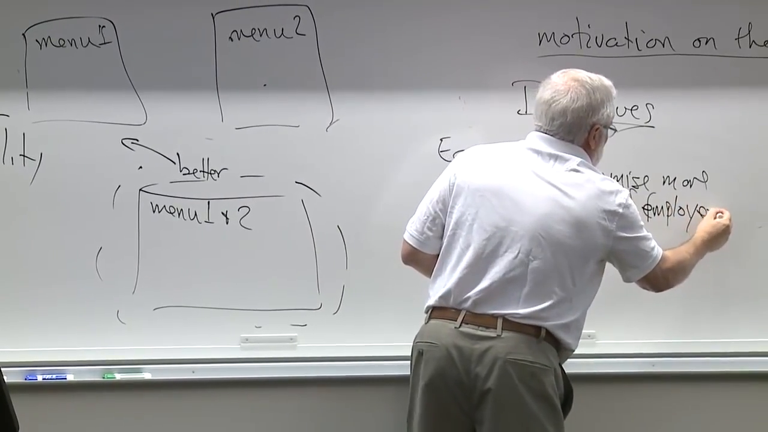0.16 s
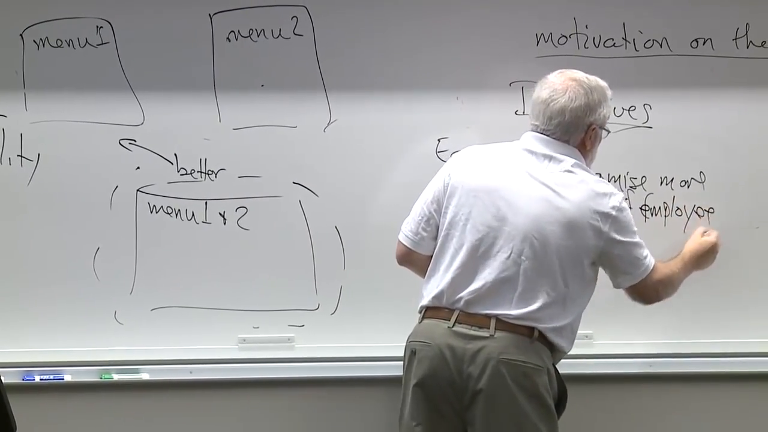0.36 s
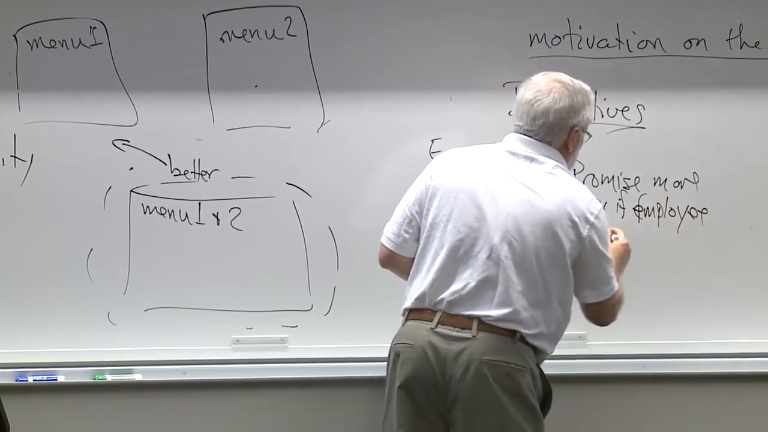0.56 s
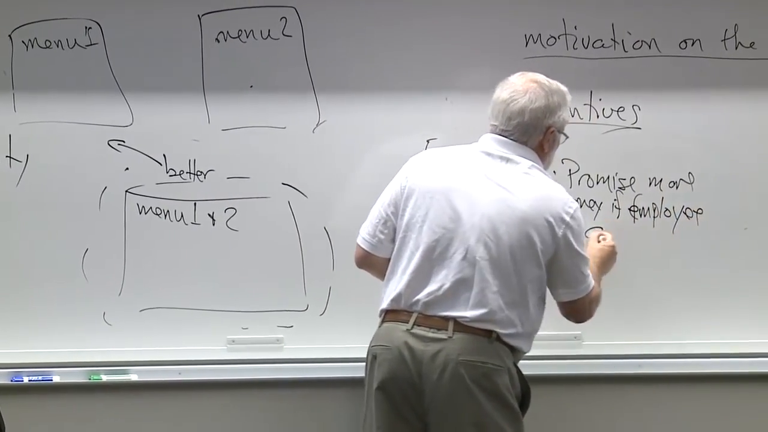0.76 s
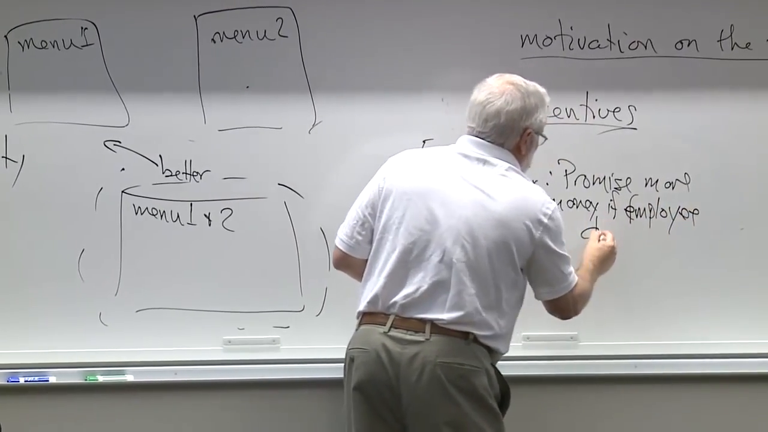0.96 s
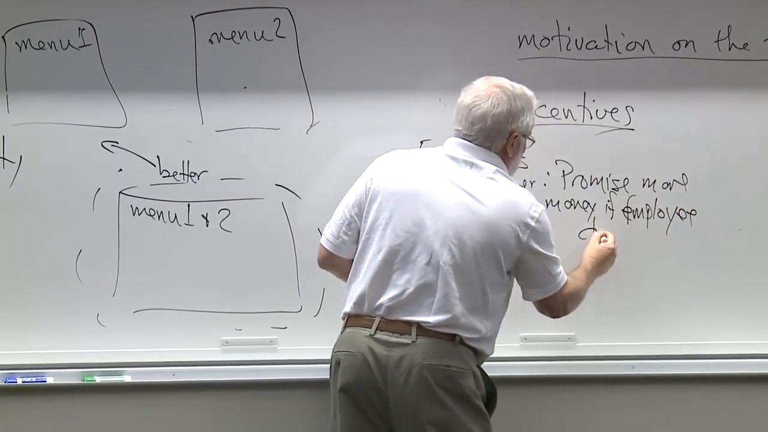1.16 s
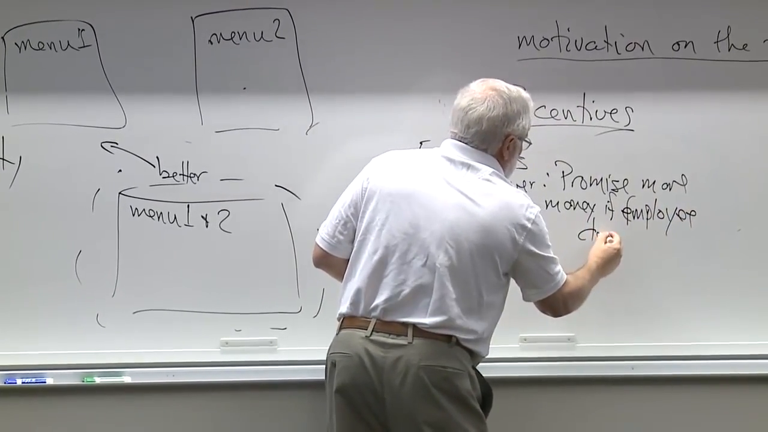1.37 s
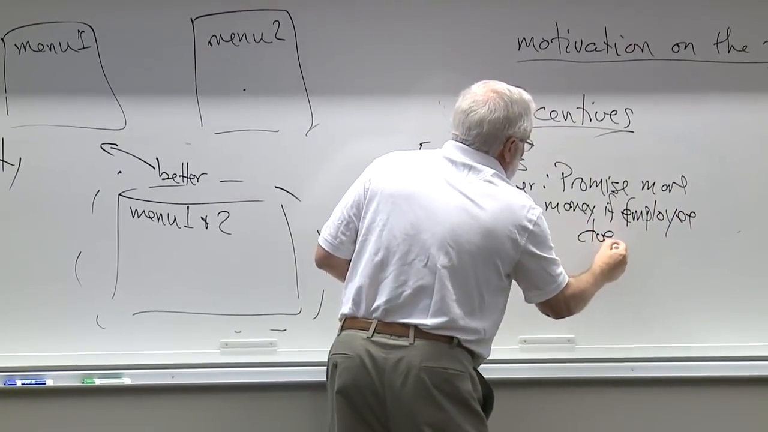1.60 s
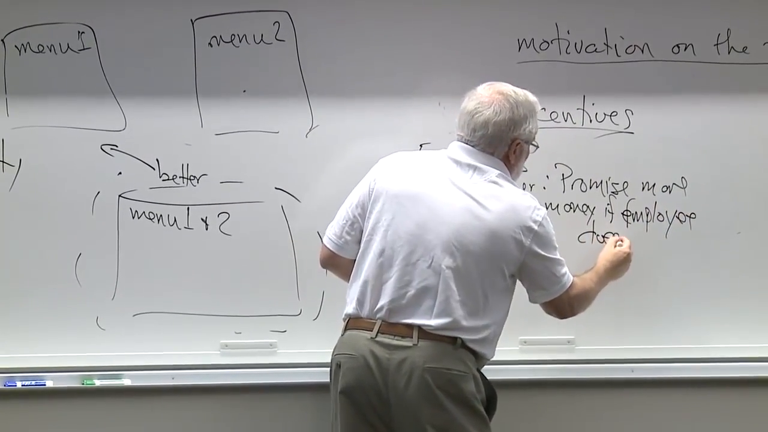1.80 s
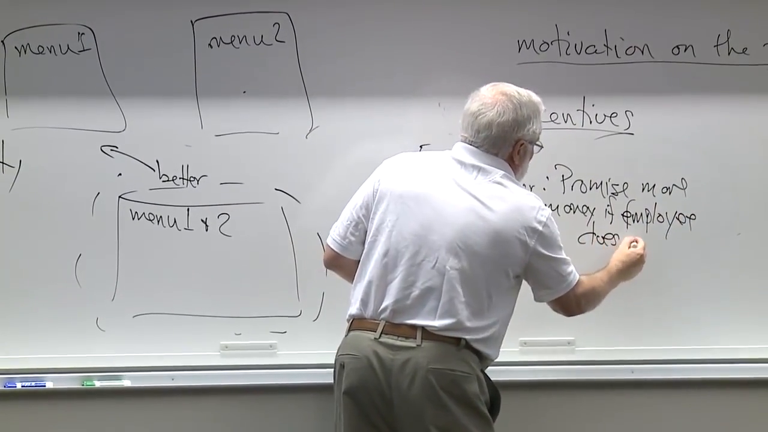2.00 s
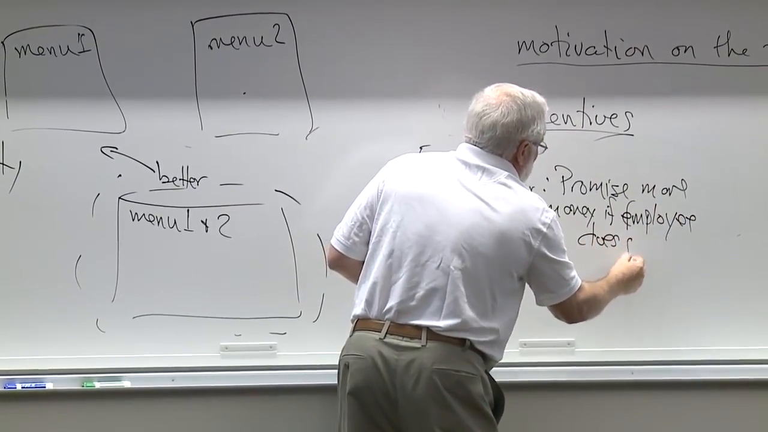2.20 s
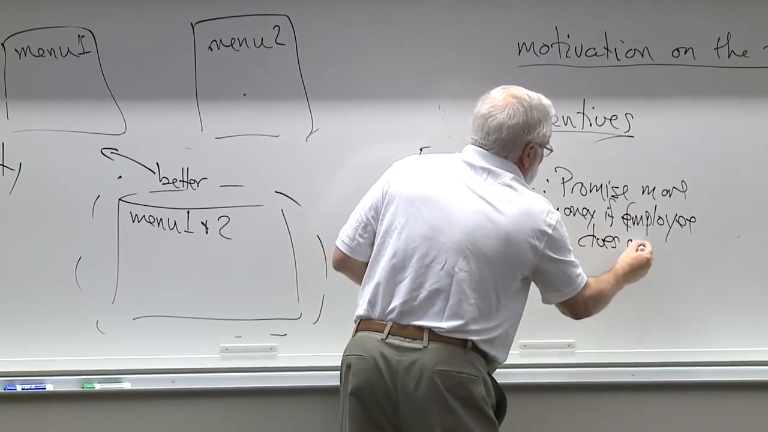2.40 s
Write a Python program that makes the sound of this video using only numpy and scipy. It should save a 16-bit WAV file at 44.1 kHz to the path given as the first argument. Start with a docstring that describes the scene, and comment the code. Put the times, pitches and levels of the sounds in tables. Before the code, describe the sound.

Quick marker strokes rub across a whiteboard in a quiet room, mixed with dull taps as the tip touches down. After a brief lull, the writing goes on with light scuffs and a few faint, thin squeaks.

```python
"""A felt marker writes quick, short strokes on a whiteboard in a lecture room.
Each stroke hisses as tiny fibre slips ring the tip and rasp the board; some add a thin
stick-slip squeak. Soft scuffs mark the turns and lifts of the tip. Each landing knocks the
hollow board, with a dull tock from the plastic barrel. Faint ventilation runs underneath."""
import sys
import numpy as np
from scipy import signal
from scipy.fft import rfft, irfft
from scipy.io import wavfile

SR = 44100
rng = np.random.default_rng(int(sys.argv[2]) if len(sys.argv) > 2 else 0)


def to_wav(s):
    """Save 16-bit WAV."""
    ch = np.atleast_2d(s).T  # columns
    pcm = np.round(np.clip(ch, -1, 1) * 32767)  # PCM
    wavfile.write(sys.argv[1], SR, pcm.astype(np.int16))


N = 108045

# The bright hiss of slipping felt. Each row: frequency in Hz, level in dB.
FELT_HISS = [(200, 0), (1500, -26), (3000, -21.5), (4200, -14), (5300, -9), (7500, -5), (9000, -6),
             (12000, -6), (14000, -12), (15700, -14)]


def amp(db):
    """Decibels to gain."""
    return 10 ** (np.asarray(db) / 20)


def unit(x):
    """Scales to an rms of 1."""
    return x / np.sqrt(np.mean(x ** 2) + 1e-20)


def curve_at(points, hz):
    """Reads a curve on a logarithmic frequency axis."""
    point_hz, value = np.transpose(points)
    return np.interp(np.log(hz + 1), np.log(point_hz + 1), value)


def add(mix, start_s, sound):
    """Mixes a sound in at a time, trimming what falls outside."""
    at = round(start_s * SR)
    sound = sound[max(-at, 0):]
    part = mix[max(at, 0):][:len(sound)]
    part += sound[:len(part)]


def colour(noise, spectrum):
    """Gives a noise a spectrum, at unit level."""
    hz = np.fft.rfftfreq(len(noise), 1 / SR)
    return unit(irfft(rfft(noise) * amp(curve_at(spectrum, hz)), len(noise)))


def butter(x, hz, kind, order):
    """Causal low-pass or high-pass."""
    return signal.sosfilt(signal.butter(order, hz, kind, fs=SR, output="sos"), x)


def wander(seconds):
    """Half a second of smooth random drift on the given time scale."""
    return unit(butter(rng.standard_normal(SR // 2), 1 / (2 * seconds), "low", order=2))


def slips():
    """Half a second of tiny fibre slips, uneven in size and fluttering in level."""
    n = SR // 2
    slips_per_s, flutter_db = 16000, 1.42
    size_db = rng.exponential(1, n) + flutter_db * wander(seconds=0.01)
    return amp(size_db) * rng.standard_normal(n) * (rng.random(n) < slips_per_s / SR)


def ringing(tone_hz, width_hz):
    """Slips heard through one resonance."""
    hz = np.fft.rfftfreq(SR // 2, 1 / SR)
    return unit(irfft(rfft(slips()) / (1 + 2j * (hz - tone_hz) / width_hz) ** 2))


def slip_burst(spectrum, level_db, rise_s, t60_s):
    """A brief cluster of slips that dies away."""
    t = np.arange(SR // 2) / SR
    attack = np.minimum(t / rise_s, 1)
    decay_db = 60 * np.maximum(t - rise_s, 0) / t60_s
    return colour(slips(), spectrum) * attack * amp(level_db - decay_db)


def stroke(length_s, level_db, tip_hz, tip_db, treble_db, rasp_db):
    """Slips hiss in the felt, ring the tip and rasp the board, swelling with the speed of the hand."""
    # The board under the rubbing tip. Each row: frequency in Hz, level in dB.
    rasp_spectrum = [(100, -9.5), (190, 6.5), (320, 0), (500, -5.5), (900, -1.5), (1500, -8), (2100, -10),
                     (2900, -12), (4000, -10.5), (8000, -19.5)]
    treble_hz, pressure_smear = 9900, 0.017
    progress = np.arange(0, length_s, 1 / SR) / length_s
    speed = abs(np.sin(np.pi * progress ** 0.92))  # peaks just before mid-stroke
    hz = np.fft.rfftfreq(SR // 2, 1 / SR)
    felt = colour(slips(), FELT_HISS)
    treble = irfft(rfft(felt) / (1 + (treble_hz / (hz + 1)) ** 10))
    rasp = colour(slips(), rasp_spectrum)
    rasp += amp(-4 + 0.6 * rasp_db) * ringing(2420, width_hz=170)  # hard rubbing wakes a narrow ring
    tip = ringing(tip_hz, width_hz=950 + pressure_smear * tip_hz)  # changing pressure widens it
    body = felt - treble + amp(tip_db) * tip + amp(rasp_db) * rasp
    n = len(speed)
    return amp(level_db) * (speed ** 1.1 * body[:n] + amp(treble_db) * speed * treble[:n])


def ventilation():
    """A faint, steady rush of air, strongest in the bass."""
    # Each row: frequency in Hz, level in dB.
    air_spectrum = [(20, -42), (45, -52), (90, 3.5), (180, -3), (330, -1), (500, -4), (900, -10.5),
                    (2000, -16), (4000, -25), (11000, -26.5), (15000, -31)]
    return amp(-77) * colour(rng.standard_normal(N), air_spectrum)


def scuff(level_db):
    """The felt drags briefly as the tip turns or lifts."""
    # Each row: frequency in Hz, level in dB.
    scuff_spectrum = [(300, -5), (900, -8.5), (1500, -2.5), (2000, -2.5), (2900, -7.5), (4000, -21),
                      (9000, -29.5)]
    return slip_burst(scuff_spectrum, level_db, rise_s=0.007, t60_s=0.07)


def board_knock(level_db, hardness_hz, place):
    """The soft tip gives the panel a rounded push and rings its modes; nearby surfaces return the thud."""
    # The hollow board's modes. Each row: frequency in Hz, level in dB, time to fall 60 dB in seconds.
    modes = [(77, -41.5, 0.25), (121.97, -31.5, 0.21), (188.5, -5.5, 0.067), (213, -37, 0.068),
             (250, -6.5, 0.11), (301.6, -11.5, 0.11), (345.2, -13, 0.084), (386.4, -21.5, 0.15),
             (464, -19.5, 0.13), (528, -12, 0.056), (566.1, 0, 0.057), (662, -24, 0.097), (701, -44, 0.04)]
    # Early reflections of the thud. Each row: delay in seconds, gain.
    reflections = [(.0092, 0.64), (0.0185, -0.21), (.0215, 1), (0.027, 0.69), (.032, 0.33), (0.049, -0.31)]
    contact_peak_s, contact_cycles, mode_rise_s = 0.00375, 0.3, 0.021
    t = np.arange(SR // 2) / SR
    push = np.exp(-0.5 * ((t - contact_peak_s) * hardness_hz / contact_cycles) ** 2)
    thud = butter(push, 257.7, "high", order=4)
    thud *= amp(0.5) / abs(thud).max()
    ring = np.zeros_like(t)
    for hz, mode_db, t60_s in modes:
        place_db = 4.5 * np.cos(place * np.sqrt(hz))  # the landing spot favours some modes
        ring += amp(mode_db + place_db - 60 * t / t60_s) * np.sin(2 * np.pi * hz * t)
    ring *= 1 - np.exp(-t / mode_rise_s)
    knock = thud.copy()
    add(knock, contact_peak_s, amp(6.5) * butter(ring, hardness_hz, "low", order=4))
    for delay_s, gain in reflections:
        add(knock, delay_s, gain * thud)
    return amp(level_db) * knock


def barrel_tock(knock_db):
    """The plastic barrel's dull knock, well below the board's."""
    # Each row: frequency in Hz, level in dB.
    tock_spectrum = [(300, -3), (800, 5.5), (1200, 0), (1700, -9.5), (3000, -19), (8000, -33)]
    return slip_burst(tock_spectrum, knock_db - 29.5, rise_s=0.0047, t60_s=0.24)


def tip_click(level_db):
    """A bright tick of slips as the felt touches down."""
    return slip_burst(FELT_HISS, level_db, rise_s=0.0035, t60_s=0.05)


def squeak(length_s, top_hz, level_db):
    """Stick and slip locks into a few thin tones whose pitch arches with the speed of the tip."""
    # The squeak's tones. Each row: pitch ratio, level in dB.
    partials = [(0.97, 3), (.93, 0), (0.36, -2), (1, -20)]
    pitch_sag, pitch_jitter = 0.27, 0.014
    progress = np.arange(0, length_s, 1 / SR) / length_s
    arch_hz = top_hz * (1 - pitch_sag * (2 * progress - 1) ** 2)
    tones = np.zeros_like(progress)
    for ratio, partial_db in partials:
        hz = ratio * arch_hz * (1 + pitch_jitter * wander(seconds=0.0025)[:len(progress)])
        tones += amp(partial_db) * np.sin(2 * np.pi * np.cumsum(hz) / SR)
    return amp(level_db) * np.sin(np.pi * progress) * tones


def room(sound):
    """The room's diffuse tail, which dies fastest in the treble."""
    # The tail's tone. Each row: frequency in Hz, level in dB.
    tail_spectrum = [(60, -15), (170, 7), (330, 5.5), (550, -2.5), (900, 5), (3000, 2.5), (15000, 2.5)]
    # The tail's length. Each row: frequency in Hz, time to fall 60 dB in seconds.
    decay_times = [(100, 0.24), (300, 0.5), (600, 0.37), (1500, 0.36), (4000, 0.19), (12000, 0.19)]
    onset_s = 0.018
    hz, t, noise = signal.stft(rng.standard_normal(SR), SR, nperseg=256)
    tail_db = curve_at(tail_spectrum, hz)[:, None] - 60 * t / curve_at(decay_times, hz)[:, None]
    _, tail = signal.istft(noise * amp(tail_db), SR, nperseg=256)
    tail *= np.minimum(np.arange(len(tail)) / SR / onset_s, 1) ** 2
    return signal.fftconvolve(sound, tail / np.linalg.norm(tail))[:N]


def scene():
    """Knocks, strokes, squeaks and scuffs in the room, over the ventilation, in mono."""
    # The tip meets the board. Each row: start in seconds, level in dB, hardness in Hz,
    # click level in dB, room send in dB, place on the board in radians per root Hz.
    landings = [(.1985, -24, 570, -65, -20, 0.69), (0.7114, -25, 610, -71, -17, 0.82),
                (0.9964, -28.5, 585, -85, -20, .92), (1.2172, -28, 558, -69, -20.5, .96),
                (1.7861, -36, 599, -84, -16.5, 0.968), (2.1304, -24, 671.6, -90, -19.5, 0.87)]
    # The writing. Each row: start in seconds, length in seconds, level in dB, tip resonance in Hz,
    # then the relative levels of that resonance, the treble and the board rasp in dB.
    strokes = [(-.03, 0.12, -63.5, 7250, -3.5, -3.5, -5), (0.042, .18, -71.5, 7240, -11, 7.5, 2),
               (0.204, 0.081, -56, 7500, -6, -1, -7), (0.243, 0.099, -64, 7400, -5.5, -0.5, -7),
               (0.32, 0.12, -58.5, 7760, -8, -5.5, -10), (0.435, 0.2, -75.5, 8000, -13, 2.5, 0.5),
               (0.726, 0.18, -71.5, 6400, -13, 8, -4), (0.748, 0.14, -55, 5900, -3, -3, -11),
               (0.772, 0.074, -59.5, 6040, 0, 7, -18), (0.994, .10, -58.5, 6000, -5.5, 3.5, 2),
               (1.086, 0.21, -87.5, 6540, -18, 5, 6.5), (1.214, 0.08, -63, 6600, -4, -0.5, 4.5),
               (1.27, 0.13, -67.5, 6640, -1, -4, -0.5), (1.385, 0.087, -69.5, 6560, -12, -9, 2),
               (1.452, 0.14, -61, 7080, -2.5, -6, -5), (1.574, 0.13, -62.5, 6920, 1, 2.5, 1),
               (1.705, 0.18, -90.5, 6800, -10, 7, 11), (1.788, 0.1, -63.5, 7000, -3.5, -2, 0),
               (1.875, 0.071, -76, 6800, -1, 2, 3.5), (1.934, 0.06, -68.5, 6550, -6.5, -7, -10.5),
               (2.137, 0.029, -68.5, 7150, 1, -2, 1), (2.158, 0.12, -64, 6840, -7, -7, -24),
               (2.255, 0.096, -69, 7040, 2.5, 3, -7.5), (2.298, 0.079, -56.5, 6710, -6, -5, -11)]
    # Each row: midpoint in seconds, length in seconds, top of the pitch arch in Hz, level in dB.
    squeaks = [(1.051, 0.15, 13400, -76), (1.259, 0.081, 14740, -69), (1.414, 0.096, 15000, -81),
               (1.525, .10, 15200, -88), (1.658, 0.068, 14360, -72), (1.814, .10, 14400, -80)]
    # Each row: start in seconds, level in dB.
    scuffs = [(0.101, -59), (0.225, -51), (0.375, -60.5), (.449, -67.5), (.491, -63.5), (0.73, -62.5),
              (0.957, -67), (1.032, -58.5), (1.231, -58.5), (1.316, -62.5), (1.793, -61), (1.857, -64.5),
              (1.906, -70.5), (2.057, -73.5), (2.157, -48.5), (2.185, -64), (2.382, -64.5), (2.443, -65)]
    # The hiss bounces off the hand and the board. Each row: delay in seconds, gain.
    near_reflections = [(.00085, -0.25), (.0021, -0.37), (.0037, -0.011), (.0064, 0.0094), (.0092, -0.011)]
    board, rubbing = np.zeros((2, N))
    for start_s, level_db, hardness_hz, click_db, room_db, place in landings:
        knock = board_knock(level_db, hardness_hz, place)
        add(board, start_s, knock)
        add(board, start_s, amp(room_db) * room(knock))
        add(board, start_s, barrel_tock(level_db))
        add(rubbing, start_s, tip_click(click_db))
    for start_s, *gesture in strokes:
        add(rubbing, start_s, stroke(*gesture))
    for middle_s, length_s, top_hz, level_db in squeaks:
        add(rubbing, middle_s - length_s / 2, squeak(length_s, top_hz, level_db))
    for start_s, level_db in scuffs:
        add(rubbing, start_s, scuff(level_db))
    reflected = room(amp(-14.5) * rubbing)
    for delay_s, gain in near_reflections:
        add(reflected, delay_s, gain * rubbing)
    return (board + rubbing + reflected + ventilation())[None]


def record(dry):
    """The microphone rolls off the bass, and a steep band limit cuts the highest treble."""
    low_cut_hz, high_cut_hz = 65, 15750
    thinned = butter(dry, low_cut_hz, "high", order=2)
    band_limit = signal.firwin(511, high_cut_hz, window=("kaiser", 9), fs=SR)
    return signal.oaconvolve(thinned, band_limit[None], "same")


dry = scene()
out = record(dry)
to_wav(out)
```